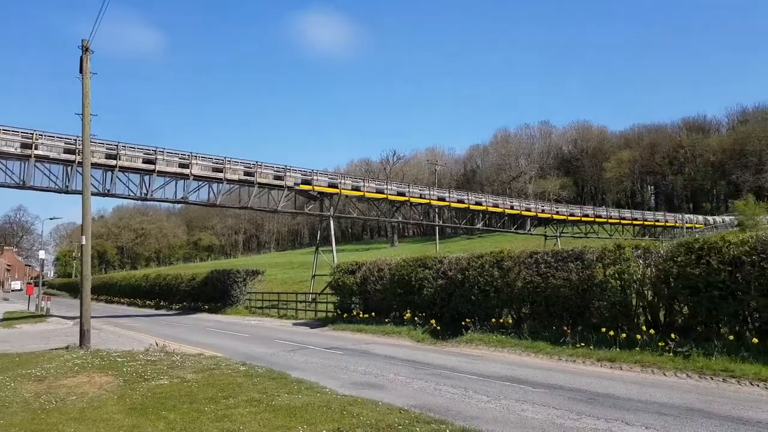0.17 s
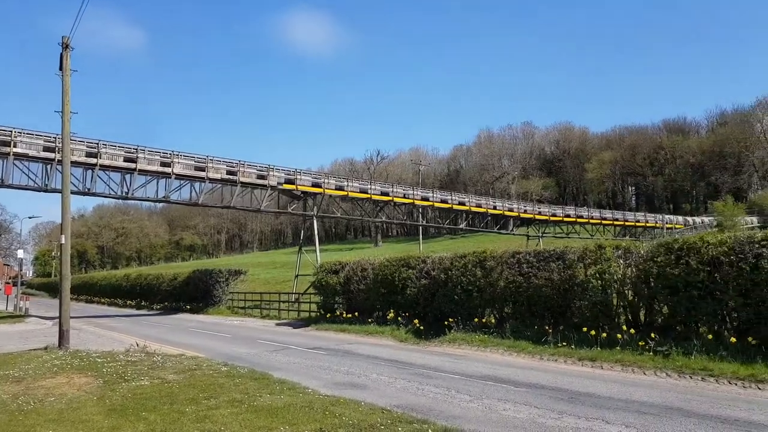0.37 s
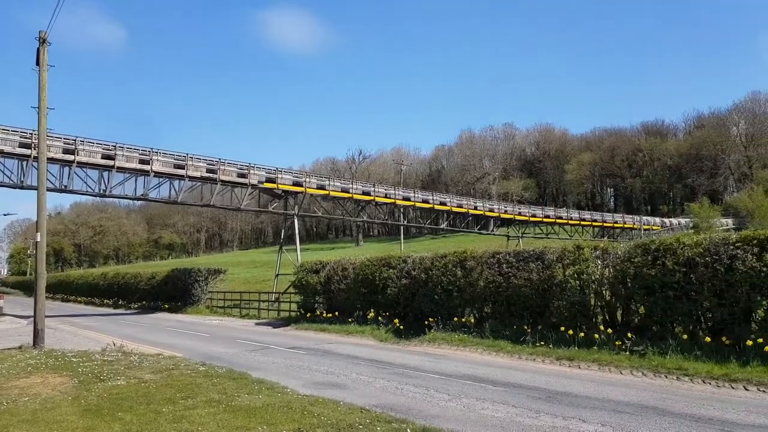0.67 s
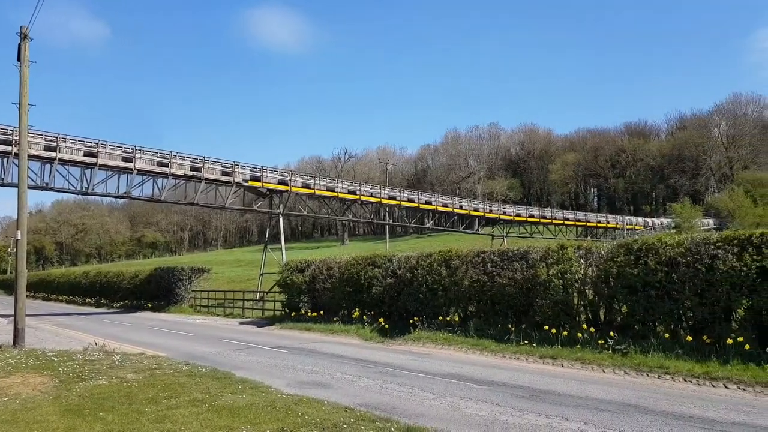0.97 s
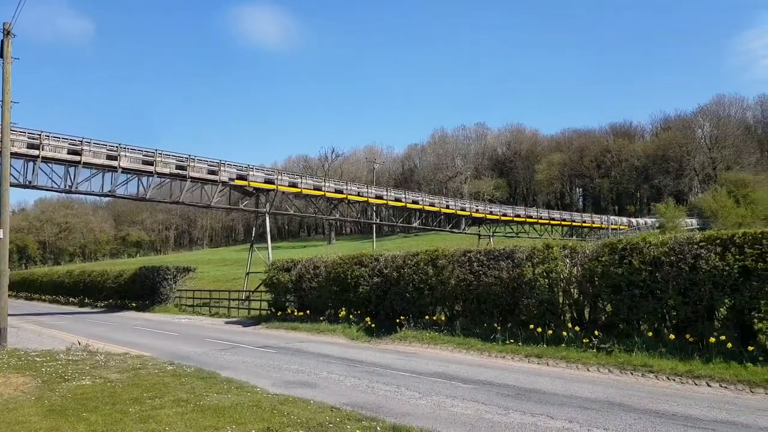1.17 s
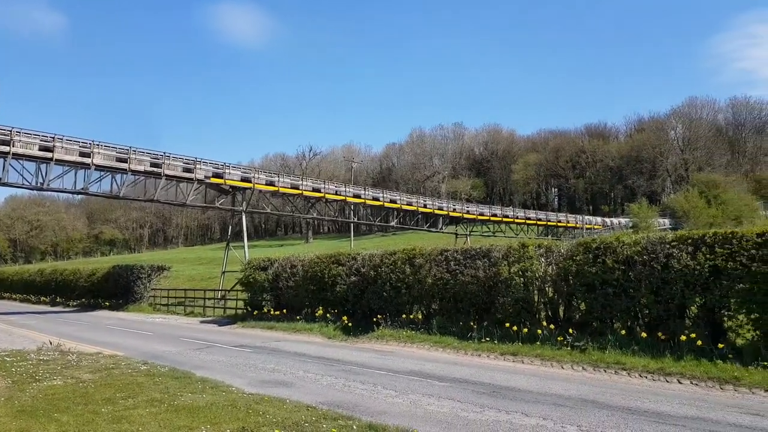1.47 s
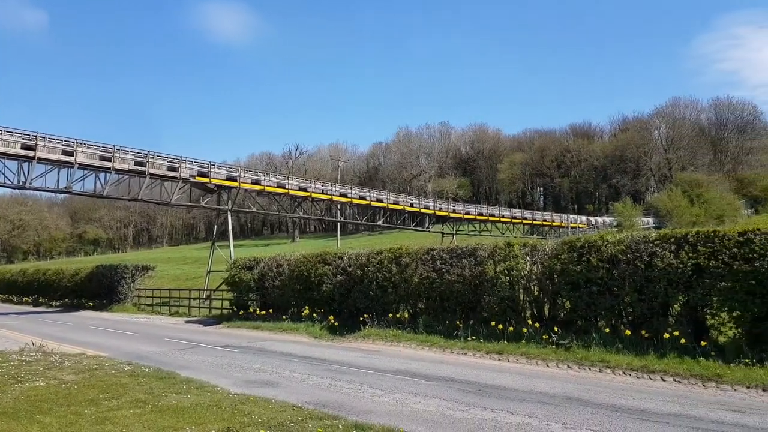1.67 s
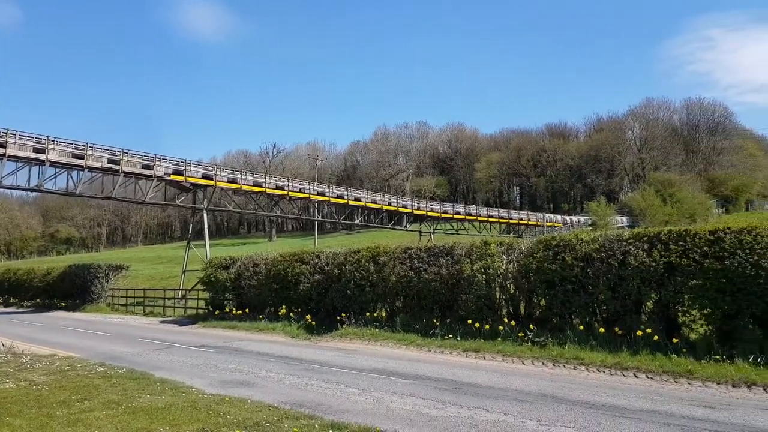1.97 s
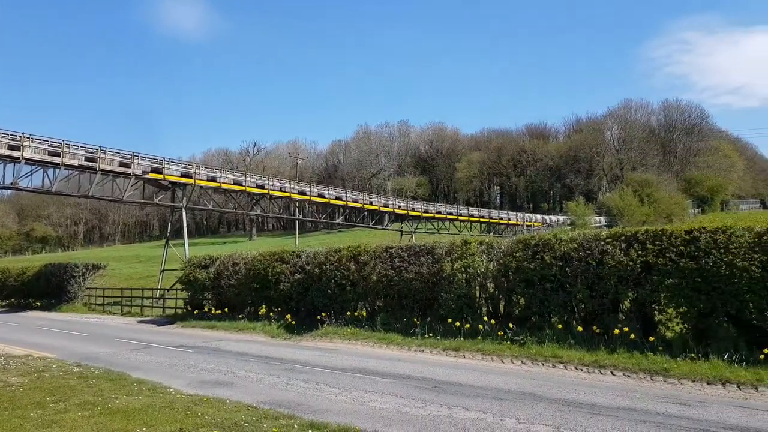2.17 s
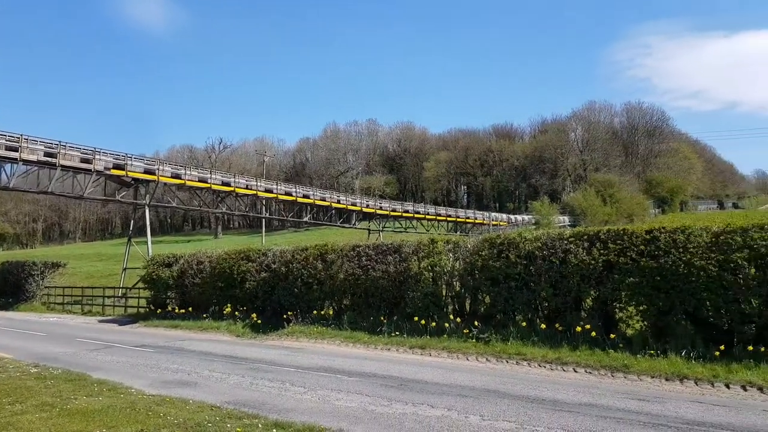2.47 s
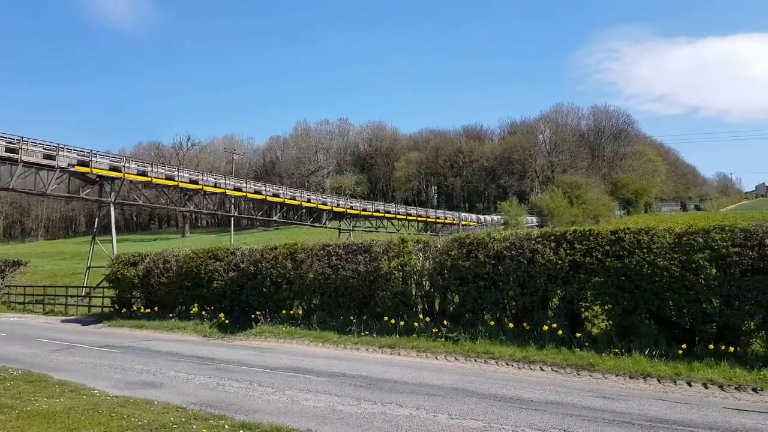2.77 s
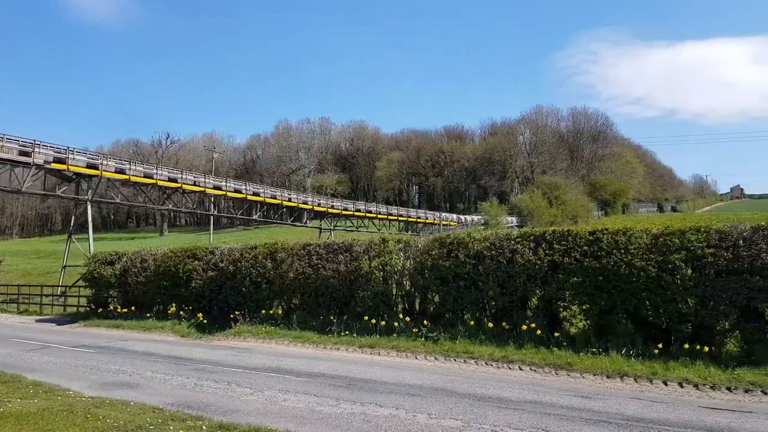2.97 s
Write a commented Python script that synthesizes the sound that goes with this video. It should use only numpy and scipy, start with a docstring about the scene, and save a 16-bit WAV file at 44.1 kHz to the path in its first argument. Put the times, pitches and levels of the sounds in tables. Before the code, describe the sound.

Steady low rumble and throbbing hum of a far-off conveyor, with faint birds outdoors.

```python
"""A long belt conveyor runs far off across a field: its drive hums and throbs, its rollers knock in every
turn, its loaded belt rumbles and its steel gantry drones in broad resonances. Sound from this side reaches
the two microphones of a phone with a small time difference. Fingers turning the phone excite its case by
stick-slip friction, and outside sound makes the case ring thinly. Behind lie an open-air roar, a light
breeze, a bird's whistle, faint chirps and the hiss of the microphones."""
import sys
import numpy as np
from scipy import signal
from scipy.fft import rfft, irfft
from scipy.io import wavfile

SR = 44100
rng = np.random.default_rng(int(sys.argv[2]) if len(sys.argv) > 2 else 0)


def dump(signal):
    """Clip the signal to [-1, 1] and save it as 16-bit WAV at the path in sys.argv[1]."""
    limited = np.clip(np.atleast_2d(signal).T, -1, 1)
    pcm = np.round(limited * 32767).astype(np.int16)
    wavfile.write(sys.argv[1], SR, pcm)


N = 137151

MOTOR_HZ, MOTOR_TRIM_DB, HUM_SWAY_DB = 52.9, -3, 3
THROB_HZ, THROB_REST_DB, THROB_WIDTH_S = 78.4, -40, 0.023  # the gearbox's main tone
ROLLER_HZ, ROLLER_DB, ROLLER_WANDER = 8.49, -38.5, 0.0016  # wander is a share of the speed
RUMBLE_DB, RUMBLE_SWAY_DB = -32.5, 1.5
GANTRY_DB, GANTRY_SWELL_S = -37.5, 0.032
RUB_DB, RUB_UNEVEN_DB, SLIPS_PER_S, RUB_ATTACK_S, RUB_RELEASE_S = -54.5, 1, 9000, 0.0053, 0.013
CASE_SWAY_DB, CASE_DRIFT = 1.9, .005  # drift is a share of each mode's frequency
SQUEAK_AT_S, SQUEAK_HZ, SQUEAK_WIDTH_S, SQUEAK_DB = .973, 4800, 0.0081, -50.5
ROAR_DB, ROAR_FALL_DB_PER_S = -35.5, .5
RING_DB, RING_FLICKER_DB = -62.5, 2
WIND_DB, WIND_HZ, WIND_WIDTH_HZ, GUST_WIDTH_S = -50, 37.2, 18, .09
CHIRP_DB, CHIRP_WIDTH_S, CHIRP_ROUGHNESS = -58.5, 0.013, .013
BIRD_DB, HISS_DB = -53.5, -62.5
MIC_LAG_S = 0.000496  # sound from the left reaches the right microphone later
GANTRY_PAN_DB, BASS_PAN_DB = -7.5, -7.5  # left minus right: the left microphone is less sensitive
TOP_HZ, FADE_S = 15550, .006

# envelope of the motor's hum: t/s, level/dB
MOTOR_ENVELOPE = [(0, -57), (.23, -31), (.44, -39), (.86, -30), (1.3, -30), (1.8, -38.5), (2.4, -34.5),
                  (2.67, -48), (2.9, -29), (3.11, -32)]
# throbs of the gearbox's main tone: t/s, level above rest/dB
THROBS = [(.13, 11), (.43, 9), (.65, 8), (.85, 11), (.94, 10.5), (1.24, 1), (1.54, 7), (1.68, 7.5),
          (2.08, 5), (2.21, 6.5), (2.35, 3), (2.59, 7.5), (2.84, 8.5), (2.98, 6)]
# lesser low hums of the conveyor, the second an overtone of the rollers: f/Hz, level/dB
LOW_HUMS = [(95.7, -42.5), (127.3, -47), (183.9, -52)]
# spectrum of a roller knock: f/Hz, relative level/dB
ROLLER_SPECTRUM = [(40, -19), (68, 7), (85, 25), (102, 7), (130, 17), (150, 12), (220, -3), (400, -54)]
# spectrum of the loaded belt: f/Hz, relative level/dB
BELT_SPECTRUM = [(15, -36), (25, -29), (42, -16), (58, 2.5), (78, 0), (110, -3.5), (170, -8.5),
                 (240, -13.5), (330, -16.5), (600, -28), (1200, -78)]
# swell of rollers and belt on the breeze: t/s, gain/dB
BASS_ENVELOPE = [(0, 1.5), (.25, -1), (.48, -1), (.88, -0.5), (1.3, 1.5), (1.75, -0.5), (2.4, -0.5),
                 (2.7, 0.5), (2.92, 2), (3.11, 0.5)]
# modes of the gantry: f/Hz, nominal width/Hz, relative level/dB
GANTRY_MODES = [(363.6, 65, -2.5), (426, 93, -1.5), (475, 56, -11), (943, 97, -11)]
# swells of the gantry's drone: t/s, level above rest/dB
GANTRY_SWELLS = [(.04, 5.5), (.57, 4), (.88, 4.5), (.99, 3), (1.32, 4), (1.48, 4), (1.6, 2), (2.05, 3.5),
                 (2.5, 3.5), (3.09, 0)]
# steady rubbing of the grip: t/s, relative level/dB
GRIP_ENVELOPE = [(0, 0), (.15, -1), (.23, -13), (.35, 0), (.42, -8), (.52, 4.5), (.63, 3), (.70, -24),
                 (.81, -2.5), (.88, 7.5), (1.01, 6), (1.1, -1.5), (1.23, 3.5), (1.3, 1), (1.46, 3),
                 (1.54, -44), (3.11, -14)]
# quick slides of a finger: t/s, relative level/dB
SLIDES = [(.142, 7.5), (.355, 6.5), (.455, 4.5), (0.563, 13.5), (0.614, 12), (.905, 7), (.974, 11.5),
          (1.439, 11), (1.665, -3)]
# dry scrape of skin: f/Hz, relative level/dB
SCRAPE_SPECTRUM = [(500, -8), (1700, 6.5), (3300, 4.5), (5300, -6.5), (6200, -18.5), (7300, -22.5),
                   (8600, -14), (11000, -18), (15000, -26)]
# balance of the scrape: f/Hz, left minus right/dB
SCRAPE_PAN = [(1500, -24.5), (2500, -7), (3050, 8.5), (3800, -8), (5300, 2), (6200, 22), (10000, 22.5),
              (13000, 15)]
# modes of the case: f/Hz, nominal width/Hz, relative level/dB, left minus right/dB, right phase lag/rad
CASE_MODES = [(2416, 70, -1, 5.5, 1.5), (3095, 47, -1, 0, 1.5), (3623, 76, -3, 12, 1),
              (3890, 91, 7.5, -3.5, 3.0), (4350, 78, -16, 2, 1), (4780, 40, -8.5, -8, 4),
              (5260, 140, -12.5, 11, -0.5), (9140, 130, -30, 11, 3)]
# how freely the rubbed case rings: t/s, gain/dB
CASE_ENVELOPE = [(0, 0), (.6, 0), (.8, -2), (1.5, -0.5)]
# distant roar of belt and road: f/Hz, relative level/dB
ROAR_SPECTRUM = [(100, -5.5), (300, -1), (540, 1.5), (720, -0.5), (930, 0.5), (1040, -2), (1150, -8.5),
                 (1450, -8.5), (1900, -11.5), (2200, -17.5), (2500, -22.5), (2800, -22.5), (3500, -25),
                 (3850, -31), (4300, -32.5), (5500, -41), (7500, -70), (15000, -76)]
# balance of the roar: f/Hz, left minus right/dB
ROAR_PAN = [(300, -4), (700, -7), (880, -0.5), (1200, -8.5), (1800, -3.5), (2400, -3), (3800, 0.5),
            (4500, 9), (7000, 10.5)]
# direct sound of the machinery in the roar: f/Hz, share of power
ROAR_DIRECT = [(300, 0.89), (550, 0.87), (750, 0.34), (1400, 0.14), (2000, 0.52), (4000, 0), (7000, 0)]
# rings of the case excited by outside sound: f/Hz, nominal width/Hz, relative level/dB
RING_BANDS = [(2485, 100, 3), (3873, 330, -3.5)]
# envelope of these rings: t/s, gain/dB
RING_ENVELOPE = [(0, -2), (.08, 7), (.15, 0), (.22, -1), (.75, -6), (1.5, -4), (1.85, -1), (2.15, 1.5),
                 (2.62, 5.5), (2.9, 2.5), (3.11, 4)]
# gusts on the microphones: t/s, level above the steady breeze/dB
GUSTS = [(.97, 4), (1.3, 5), (2.96, 3)]
# contour of the bird's whistle: t/s, f/Hz, relative level/dB
WHISTLE = [(1.76, 2326, -16), (1.81, 2310, -3), (1.85, 2374, -7), (1.885, 2505, 1), (1.915, 2530, 3),
           (1.945, 2400, -3), (1.99, 2280, -16)]
# distant chirps: t/s, f/Hz, relative level/dB
CHIRPS = [(.025, 3900, -16), (.08, 3700, 8), (.14, 3770, 5), (.465, 3850, -3), (.52, 3760, 3)]
# self-noise of the left and the right microphone: f/Hz, relative level/dB
HISS_LEFT = [(2000, -15), (5500, -6.5), (6800, -8), (7200, -20), (7750, -27), (8050, -9), (9200, -3.5),
             (12000, -1), (15500, -3)]
HISS_RIGHT = [(2000, -15), (6500, -45), (8000, -28), (9700, -28), (10300, -8.5), (11800, 0), (13600, -2),
              (15500, -2)]


def drive():
    """Amplitude modulation: the motor hums, the gearbox throbs, lesser low hums sway on moving air."""
    t = np.arange(N) / SR
    motor_tone = np.sin(2 * np.pi * MOTOR_HZ * t + 0.21 * walk(3.3))
    motor = undb(MOTOR_TRIM_DB + curve(MOTOR_ENVELOPE)) * motor_tone
    main_tone = np.sin(2 * np.pi * THROB_HZ * t + 0.5 * walk(6.7))
    throb = undb(THROB_REST_DB) * swells(THROBS, THROB_WIDTH_S) * main_tone
    hums = 0
    for hz, db in LOW_HUMS:
        gain = undb(db + HUM_SWAY_DB * walk(4.5))
        hums += gain * np.sin(2 * np.pi * (hz * t + rng.random()) + 0.57 * walk(2.55))
    return from_side(np.sqrt(2) * (motor + throb + hums), BASS_PAN_DB)


def rollers():
    """Periodic impacts: worn rollers knock at the same places each turn; only the bass carries far."""
    turns = np.cumsum(ROLLER_HZ * (1 + ROLLER_WANDER * walk(0.73))) / SR
    knocks = np.zeros(N)
    for place, strength in rng.random(size=(24, 2)):
        knocks += np.diff(np.floor(turns + place), prepend=0) * (strength - .5)
    rumble = filtered(knocks * undb(0.5 * walk(1.7)), undb(across(ROLLER_SPECTRUM)))
    return from_side(level(rumble, ROLLER_DB), BASS_PAN_DB)


def belt():
    """Random vibration: the loaded belt radiates low noise whose level sways slowly."""
    rumble = field(undb(across(BELT_SPECTRUM)), direct=0.79, pan_db=BASS_PAN_DB)
    return level(rumble, RUMBLE_DB) * undb(RUMBLE_SWAY_DB * walk(0.67))


def gantry():
    """Forced resonance: the steel gantry drones in a few broad modes and swells now and then."""
    drone = field(bands(GANTRY_MODES), direct=1.0, pan_db=GANTRY_PAN_DB)
    return level(drone, GANTRY_DB) * swells(GANTRY_SWELLS, GANTRY_SWELL_S)


def fingers():
    """Stick-slip friction: skin makes dense tiny clicks, heard dry and through the modes of the case."""
    t = np.arange(N) / SR
    power = undb(curve(GRIP_ENVELOPE)) ** 2
    for at, db in SLIDES:
        power += undb(db) ** 2 * np.exp(-np.maximum((at - t) / RUB_ATTACK_S, (t - at) / RUB_RELEASE_S))
    clicks = (rng.random((2, N)) < SLIPS_PER_S / SR) * rng.standard_normal((2, N))
    slips = clicks + 0.39 * rng.standard_normal((2, N))
    scrape = filtered(slips, panned(undb(across(SCRAPE_SPECTRUM)), across(SCRAPE_PAN)))
    rub = level(scrape, 0) + case(slips[0])
    return level(rub, RUB_DB) * np.sqrt(power) * undb(RUB_UNEVEN_DB * walk(30))


def case(slips):
    """Modal ringing: slips excite the case; the shifting grip varies each mode's pitch and strength."""
    out = 0
    for hz, width, db, pan, lag in CASE_MODES:
        ring = signal.hilbert(filtered(slips, resonance(hz, 2 * width) ** 2))
        drift = 2 * np.pi * np.cumsum(hz * CASE_DRIFT * walk(12)) / SR
        detuned = np.real(ring * np.exp(1j * np.array([drift, drift - lag])))
        out += panned(detuned, pan) * undb(db + CASE_SWAY_DB * walk(13))
    return level(out, 0) * undb(curve(CASE_ENVELOPE))


def squeak():
    """Friction-induced oscillation: one slide catches for a moment and gives a wavering tone."""
    squeal = tone(SQUEAK_HZ * (1 + 0.015 * walk(200)))
    return panned(squeal * undb(SQUEAK_DB) * bump(SQUEAK_AT_S, SQUEAK_WIDTH_S), db=2)


def roar():
    """Direct and diffuse sound: far belt and road noise blend into a roar that slowly sinks."""
    air = field(undb(across(ROAR_SPECTRUM)), across(ROAR_DIRECT), across(ROAR_PAN))
    return level(air, ROAR_DB) * undb(-ROAR_FALL_DB_PER_S * np.arange(N) / SR)


def case_rings():
    """Resonance: outside sound excites the case in two thin, flickering rings near 2.5 and 3.9 kHz."""
    rings = field(bands(RING_BANDS), direct=0.3, pan_db=-0.5)
    return level(rings, RING_DB) * undb(curve(RING_ENVELOPE) + RING_FLICKER_DB * walk(6.3))


def wind():
    """Turbulent pressure: a light breeze buffets each microphone independently."""
    buffet = filtered(np.array([noise(), noise()]), resonance(WIND_HZ, WIND_WIDTH_HZ) ** 2)
    return panned(level(buffet, WIND_DB) * swells(GUSTS, GUST_WIDTH_S), BASS_PAN_DB)


def bird():
    """Reverberation: scattering among trees blurs one faint, arched whistle."""
    t = np.arange(N) / SR
    hz = curve(WHISTLE) * (1 + 0.006 * walk(83))
    singing = (t > WHISTLE[0][0]) * (t < WHISTLE[-1][0])
    call = tone(hz) * undb(BIRD_DB + curve(WHISTLE, column=2)) * singing
    trees = rng.standard_normal((2, N)) * np.exp(-t / .08)
    echoes = filtered(call, rfft(level(trees, 0)) / np.sqrt(N))
    return panned(call + undb(-8) * echoes, db=2)


def chirps():
    """Random frequency modulation roughens short, distant chirps, perhaps a small bird's."""
    waver = 1 + CHIRP_ROUGHNESS * walk(150)
    calls = sum(tone(hz * waver) * undb(CHIRP_DB + db) * bump(at, CHIRP_WIDTH_S) for at, hz, db in CHIRPS)
    return panned(calls, db=-4.0)


def hiss():
    """Self-noise: each microphone adds its own thin, uncorrelated hiss."""
    pair = [filtered(noise(), undb(across(spectrum))) for spectrum in (HISS_LEFT, HISS_RIGHT)]
    return level(np.array(pair), HISS_DB)


def field(response, direct, pan_db):
    """Partial coherence: a share of the noise power arrives directly, the rest scattered from all round."""
    share = np.clip(direct, 0, 1)
    straight = filtered(noise(), response * np.sqrt(share))
    scattered = filtered(np.array([noise(), noise()]), response * np.sqrt(1 - share))
    return from_side(straight + scattered, pan_db)


def from_side(x, pan_db):
    """Path difference: sound from the machinery's side reaches the right microphone later."""
    late = np.exp(-2j * np.pi * freqs() * MIC_LAG_S)
    return filtered(x, panned(np.array([np.ones(len(late)), late]), pan_db))


def panned(x, db):
    """Level difference, left minus right, split between the channels."""
    return x * np.array([undb(db / 2), undb(-db / 2)]).reshape(2, -1)


def resonance(hz, width):
    """Response of a damped oscillator, gain 1 at its centre."""
    return 1 / (1 + 1j * (freqs() / hz - hz / freqs()) * hz / width)


def bands(rows):
    """Incoherent sum: the gain of resonant bands that add in power."""
    return np.sqrt(sum(undb(db) ** 2 * abs(resonance(hz, width)) ** 4 for hz, width, db in rows))


def tone(hz):
    """A sine whose phase is the integral of its frequency."""
    return np.sin(2 * np.pi * np.cumsum(hz) / SR)


def noise():
    """White noise."""
    return rng.standard_normal(N)


def walk(rate_hz):
    """Smooth random fluctuation with an rms of 1."""
    return level(filtered(noise(), 1 / (1 + (freqs() / rate_hz) ** 4)), 0)


def bump(at, width):
    """A Gaussian pulse around one moment."""
    return np.exp(-((np.arange(N) / SR - at) / width) ** 2 / 2)


def swells(rows, width):
    """A gain that rests at 1 and swells at each row of t/s, level/dB."""
    return 1 + sum((undb(db) - 1) * bump(at, width) for at, db in rows)


def curve(rows, column=1):
    """One column of a time table, interpolated at every sample."""
    rows = np.array(rows)
    return np.interp(np.arange(N) / SR, rows[:, 0], rows[:, column])


def across(points):
    """Rows of f/Hz and a value, interpolated on a log-frequency axis."""
    hz, value = np.array(points).T
    return np.interp(np.log(freqs()), np.log(hz), value)


def freqs():
    """The frequency of each spectral bin, at least 1 Hz."""
    return np.maximum(np.arange(N // 2 + 1) * SR / N, 1)


def filtered(x, response):
    """Linear filtering: spectrum times frequency response."""
    return irfft(rfft(x) * response, N)


def level(x, db):
    """Set the rms level."""
    return x * undb(db) / np.sqrt(np.mean(x ** 2))


def undb(db):
    """Decibels to amplitude ratio."""
    return 10 ** (np.asarray(db) / 20)


def scene():
    """Superposition: the conveyor, the open air, the hand on the phone, the birds and the hiss add."""
    conveyor = drive() + (rollers() + belt()) * undb(curve(BASS_ENVELOPE)) + gantry()
    return conveyor + roar() + case_rings() + wind() + fingers() + squeak() + bird() + chirps() + hiss()


def record(dry):
    """Band limiting: the phone cuts the top steeply; the sound starts and stops softly."""
    t = np.arange(N) / SR
    to_edge_s = np.minimum(t, t[::-1])
    fade = np.sin(np.pi / 2 * np.minimum(to_edge_s / FADE_S, 1)) ** 2
    lowpass = signal.ellip(10, .2, 80, TOP_HZ, fs=SR, output="sos")
    return signal.sosfilt(lowpass, dry * fade)


dry = scene()
out = record(dry)
dump(out)
```